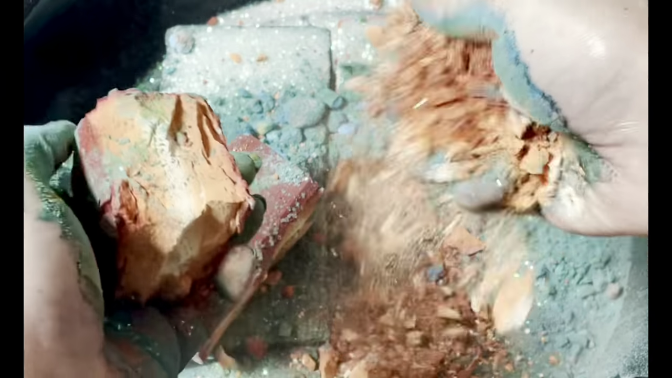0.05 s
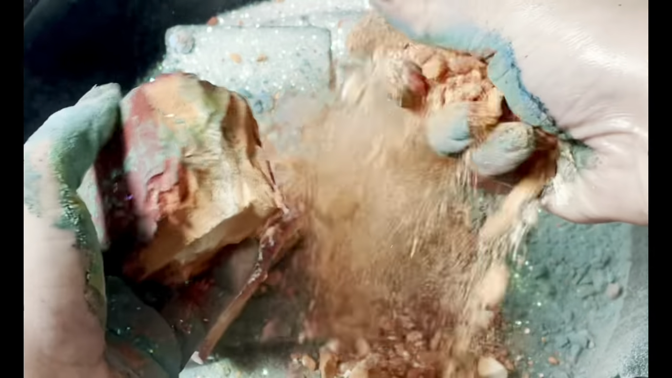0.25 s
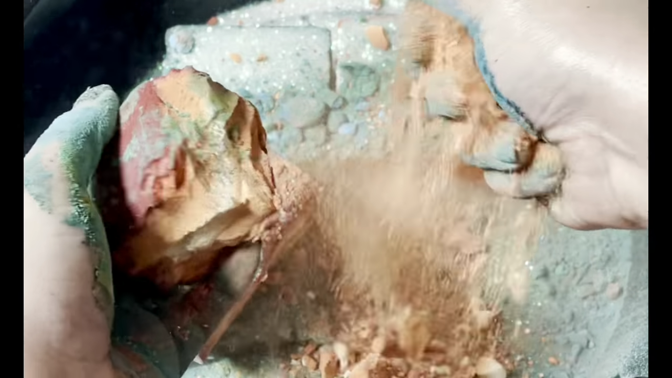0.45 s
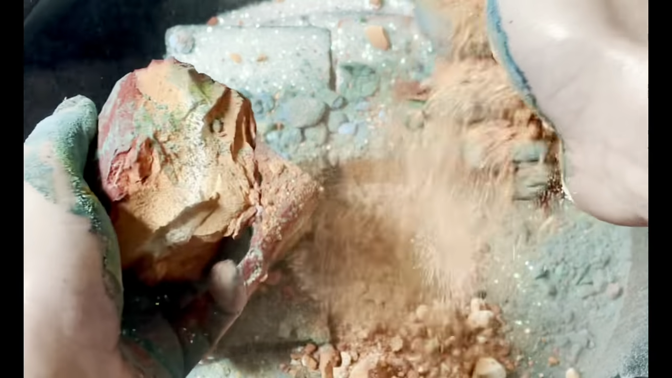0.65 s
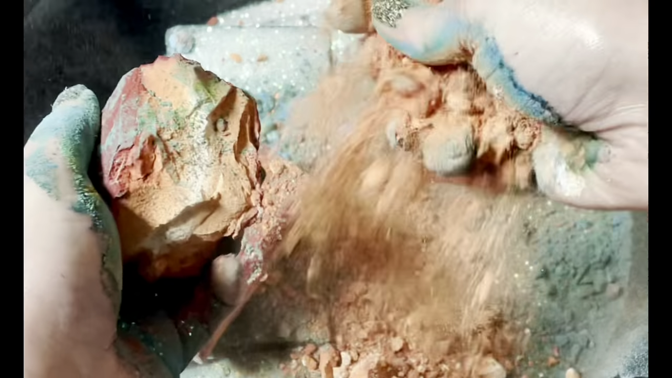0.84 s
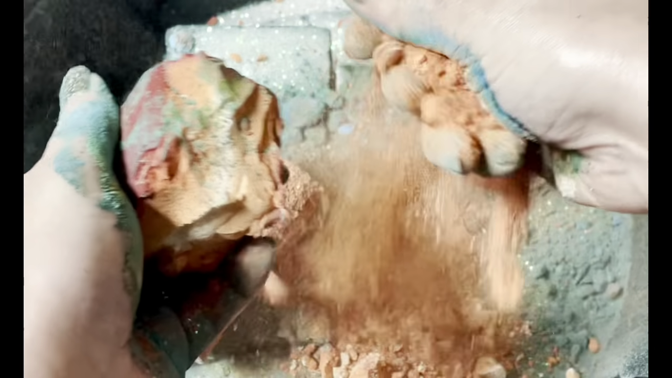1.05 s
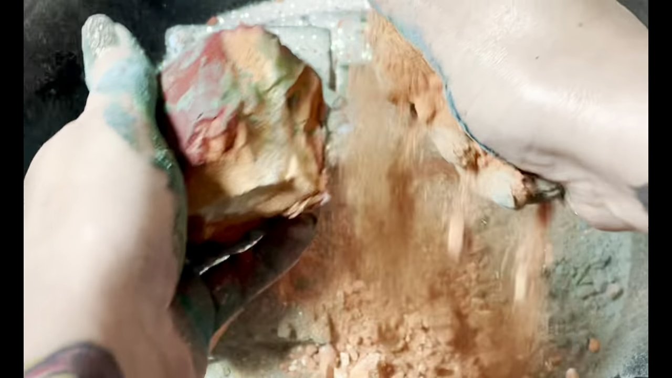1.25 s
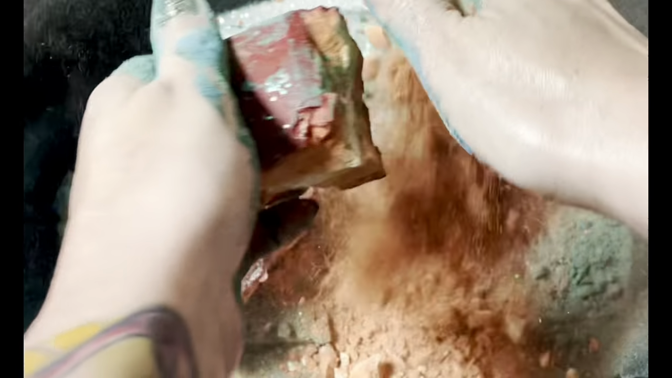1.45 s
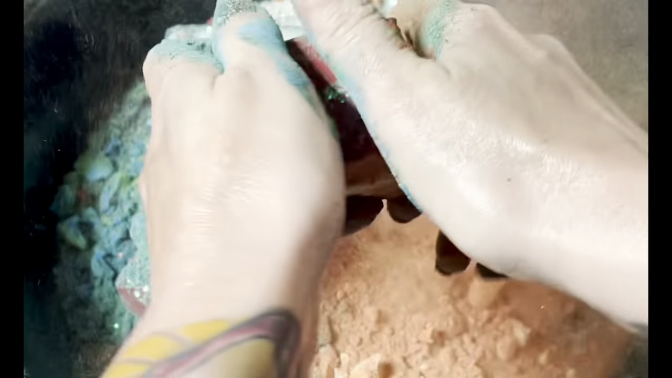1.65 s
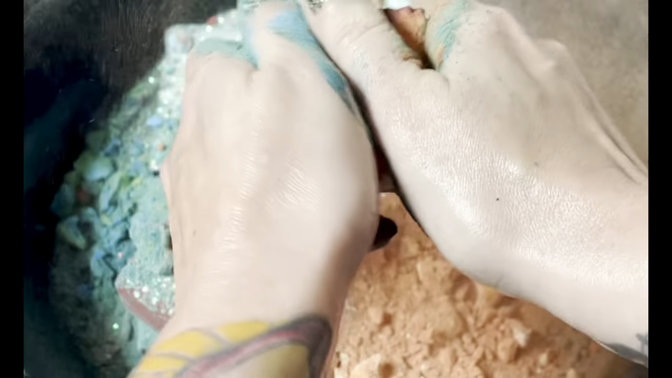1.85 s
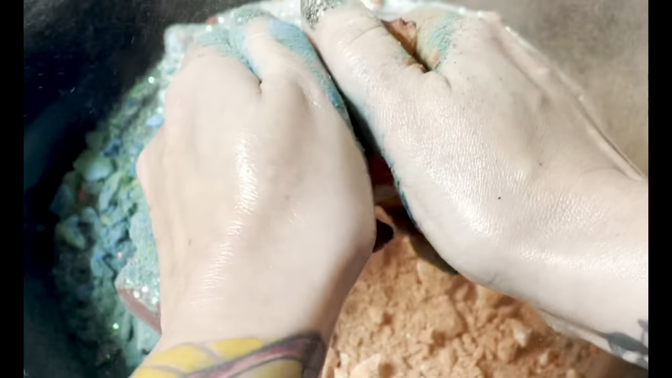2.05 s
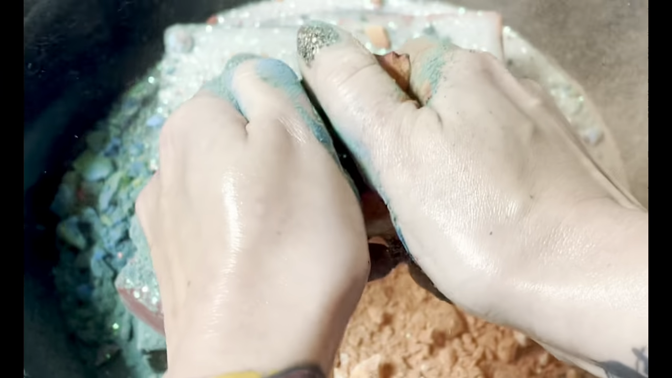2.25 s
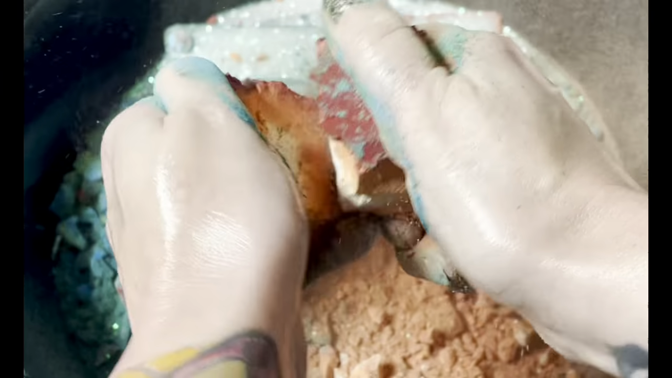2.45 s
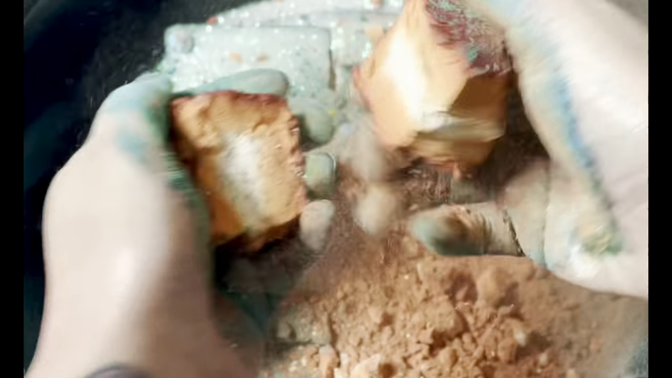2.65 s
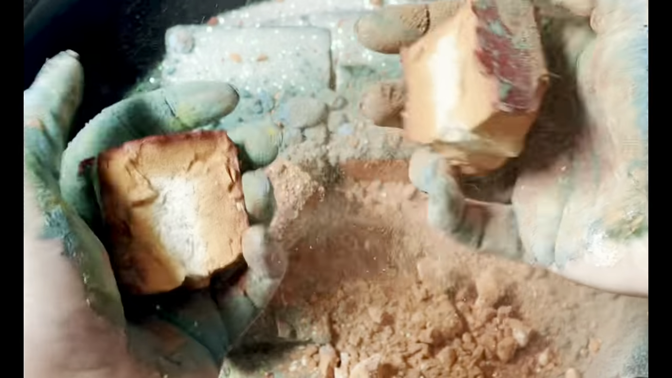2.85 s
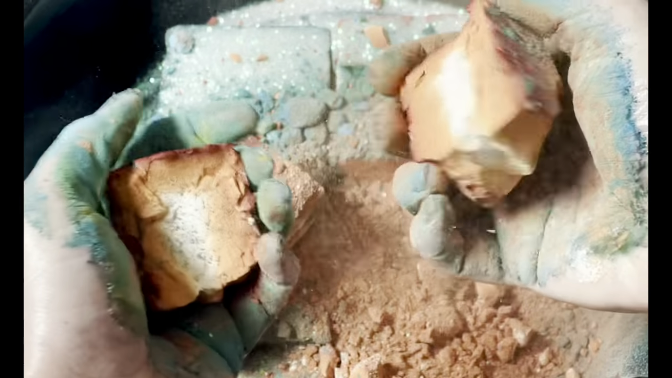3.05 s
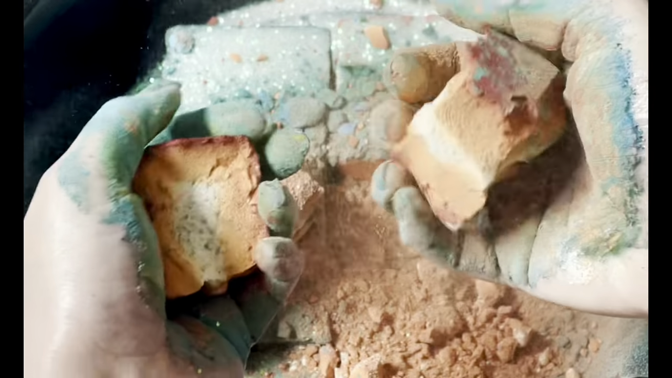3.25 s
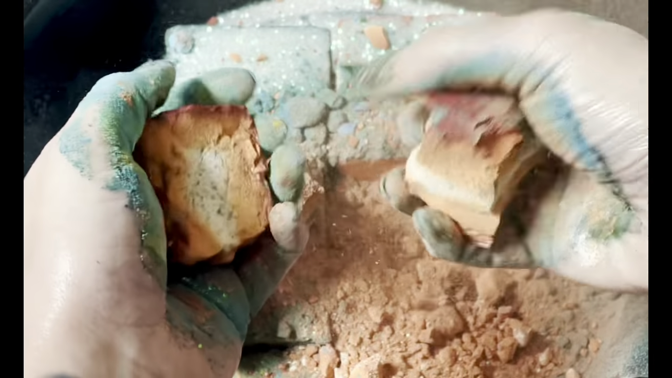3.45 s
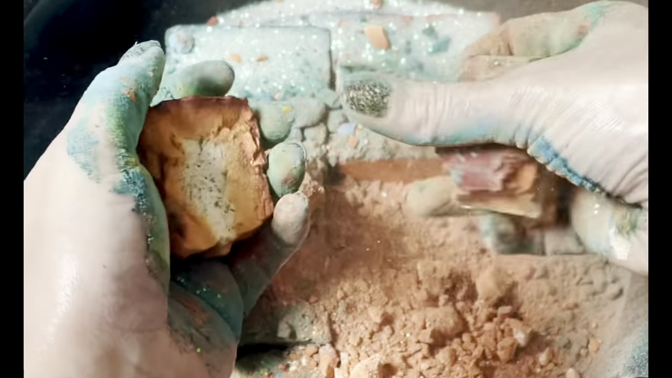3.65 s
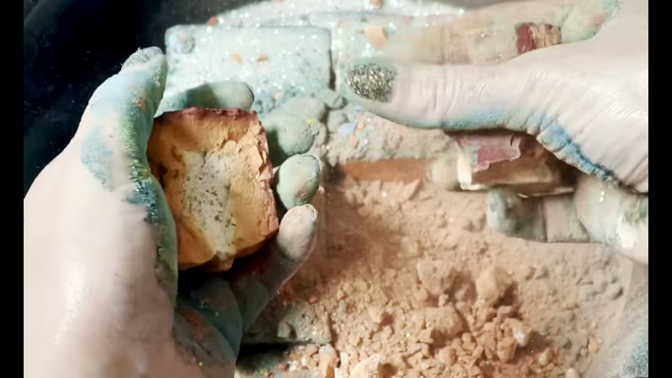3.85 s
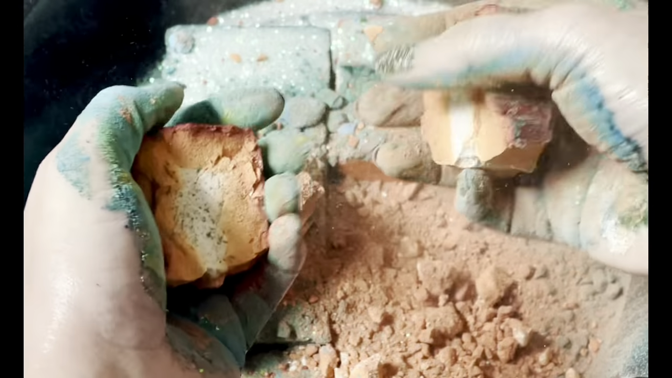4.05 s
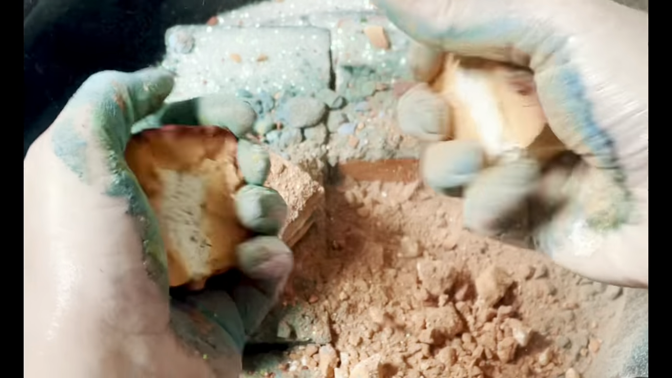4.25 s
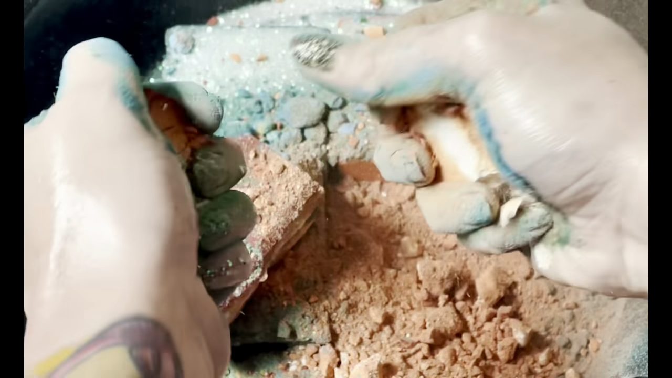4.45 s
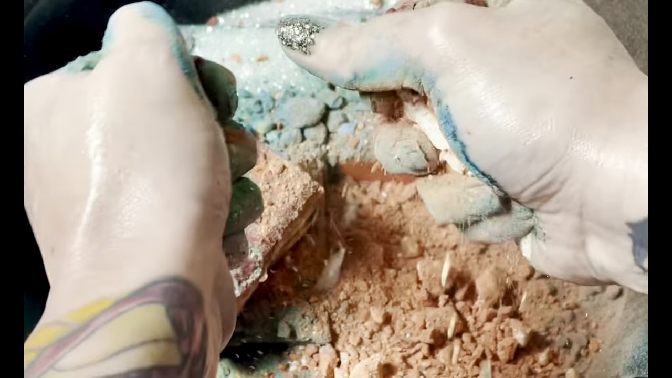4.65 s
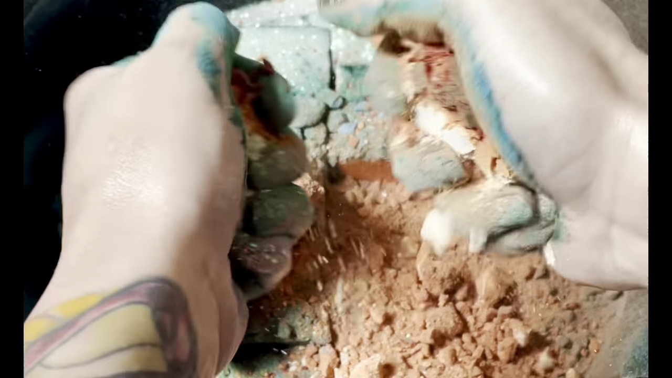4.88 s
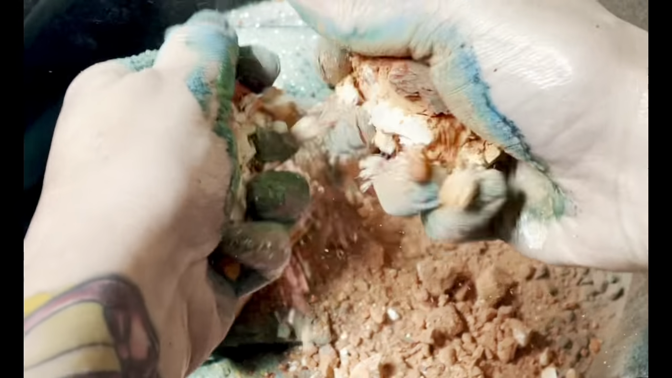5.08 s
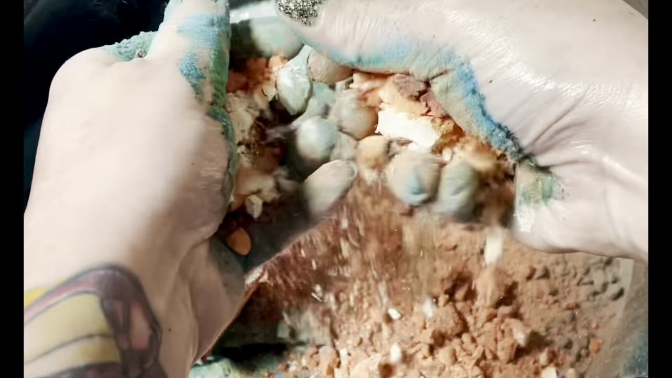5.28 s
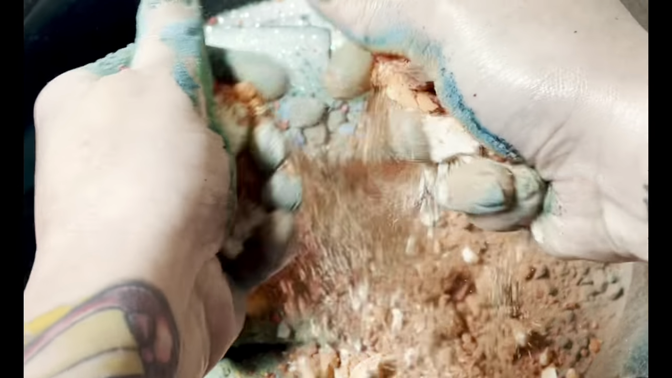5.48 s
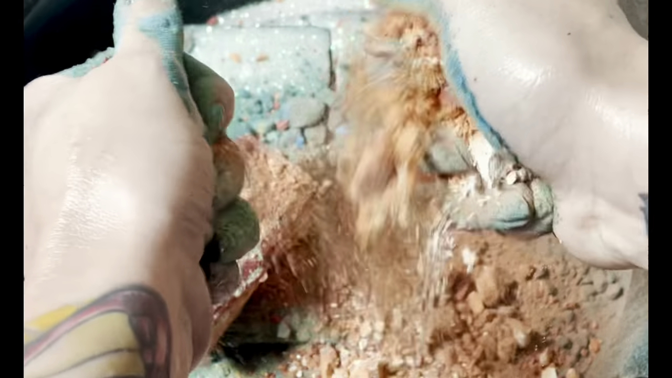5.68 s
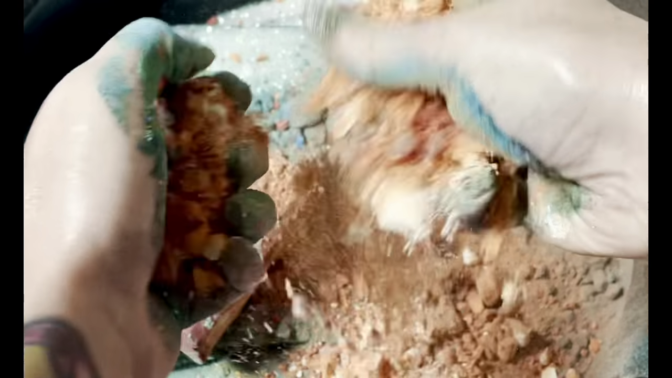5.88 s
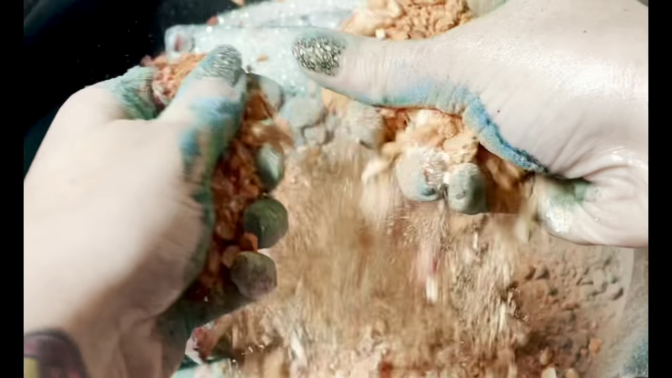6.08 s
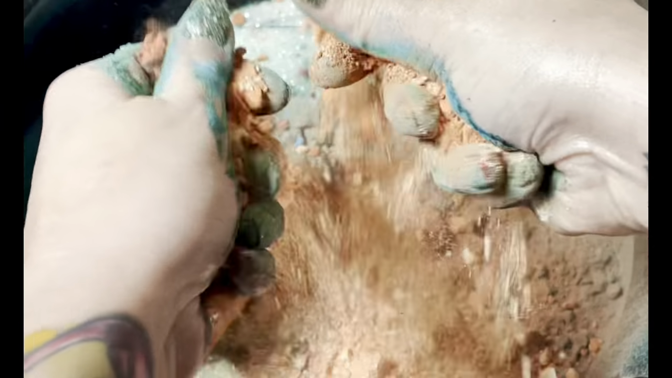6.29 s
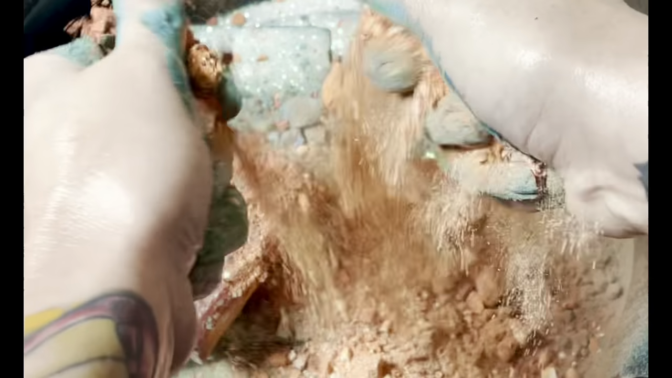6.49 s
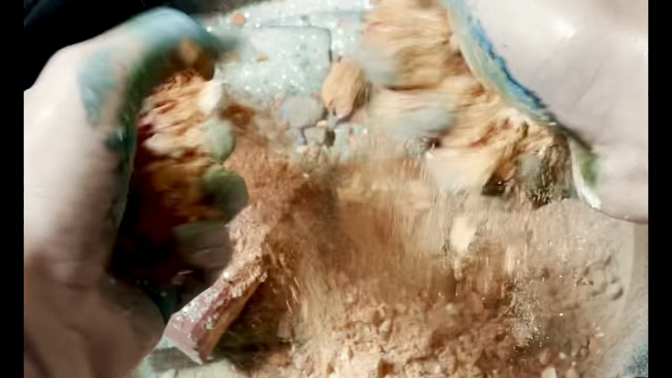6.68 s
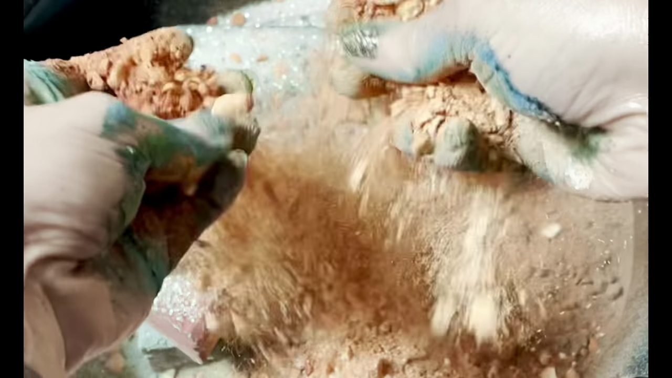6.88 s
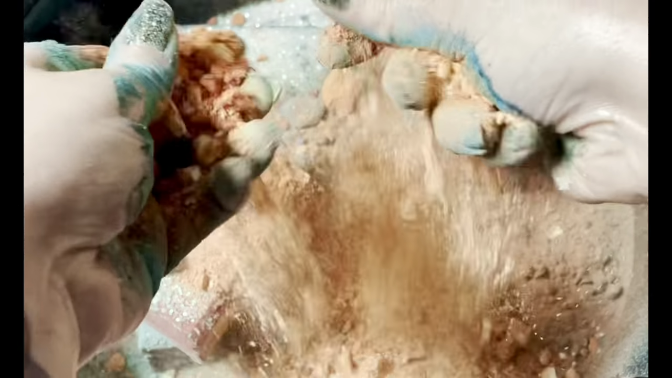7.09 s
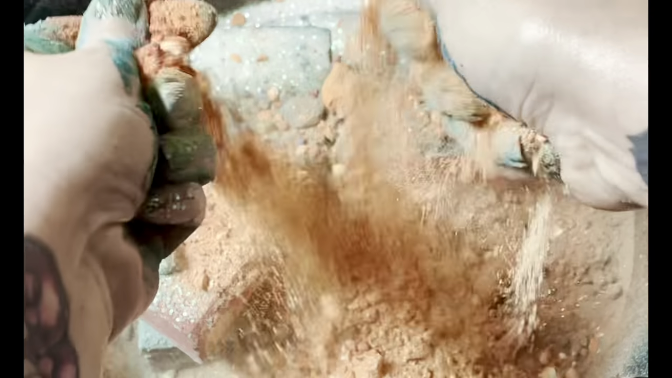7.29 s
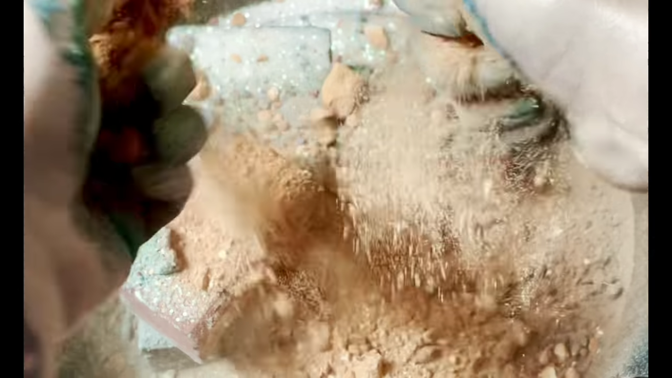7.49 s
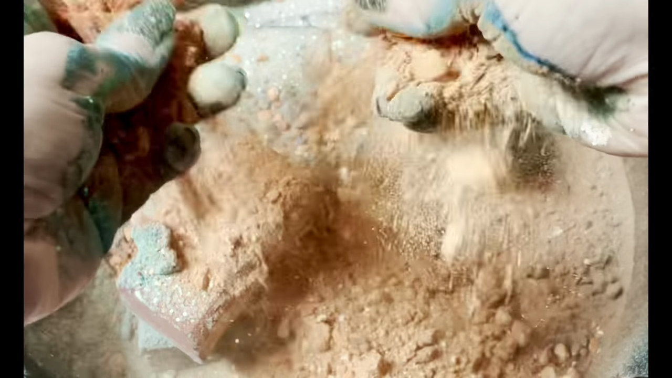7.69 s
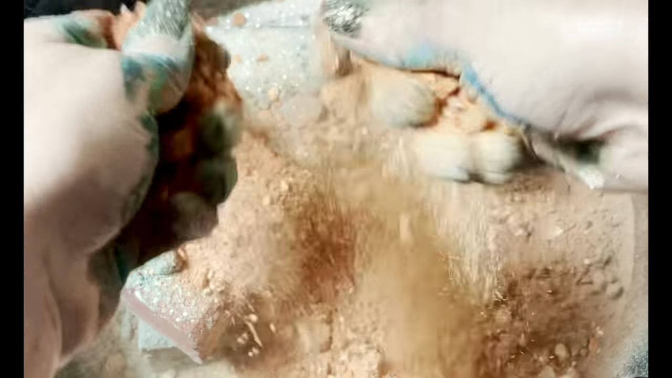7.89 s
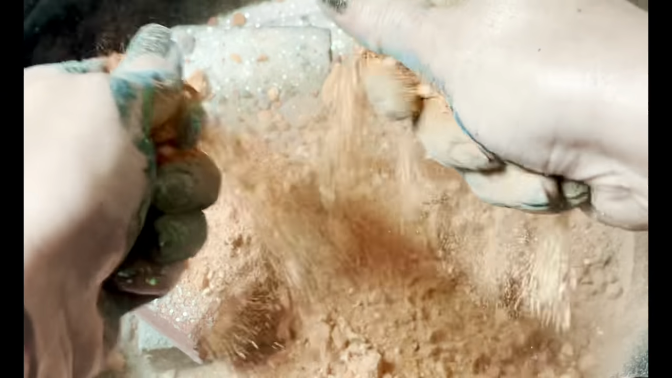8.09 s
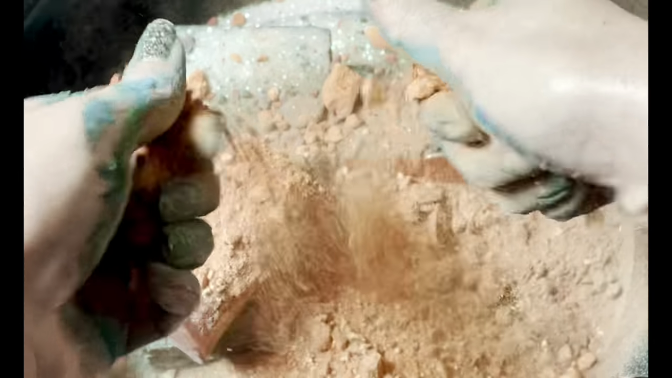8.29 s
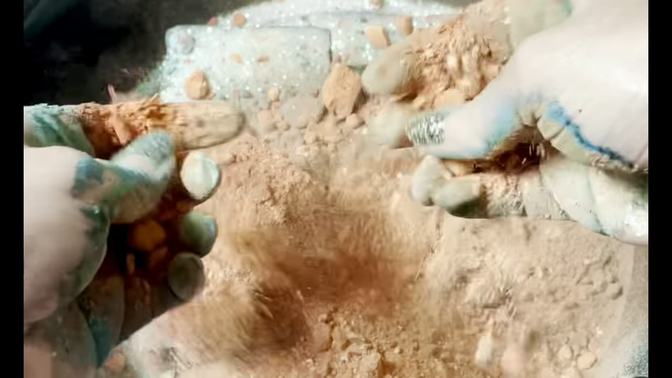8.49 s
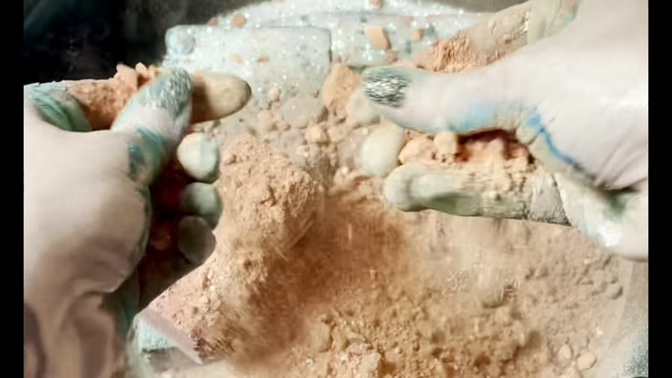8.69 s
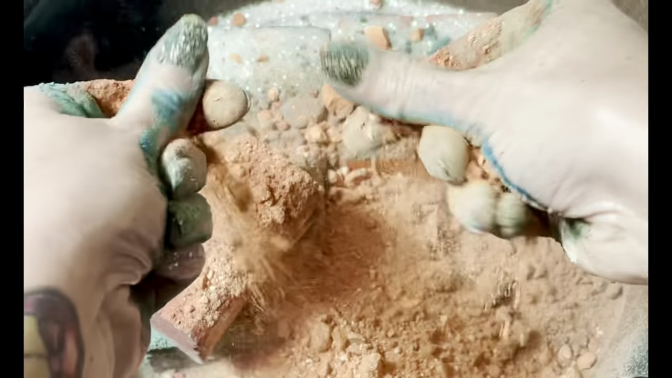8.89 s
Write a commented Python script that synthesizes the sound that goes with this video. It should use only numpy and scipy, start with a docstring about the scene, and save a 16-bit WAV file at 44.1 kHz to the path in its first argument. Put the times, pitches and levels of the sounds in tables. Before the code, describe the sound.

Hands crush dry chalk blocks into crumbs right at the microphone, with gritty crunching, ticking, one loud crack, and powder hissing down.

```python
"""Two hands crush blocks of gym chalk over a tub of powder, right at the microphone of a small room. The blocks
tick under strain, one breaks in half with a loud crack, and the pieces are squeezed to crumbs. Single fractures
are short noise rattles; thousands of smaller ones and filtered noise make the crunching bed and the hiss of
powder. Jittered modes make short hollow rings, gliding low tones the thuds of the block and the tub, and low
noise the rumble of air and tub; a faint room tail lies behind."""
import sys
import numpy as np
from scipy import signal
from scipy.fft import rfft, irfft, next_fast_len
from scipy.io import wavfile
from scipy.ndimage import uniform_filter1d

SR = 44100
rng = np.random.default_rng(int(sys.argv[2]) if len(sys.argv) > 2 else 0)


def wrap_up_sound(samples):
    """Save the sound to the file named by the first command line argument, as 16-bit audio."""
    columns = np.atleast_2d(samples).T
    # keep every value between -1 and 1, then stretch to whole-number steps
    tamed = np.clip(columns, -1, 1)
    steps = np.round(tamed * 32767).astype(np.int16)
    wavfile.write(sys.argv[1], SR, steps)


N = 393811


def amp(db):
    """Decibels to gain."""
    return 10 ** (np.asarray(db) / 20)


def unit(x):
    """Scales to rms 1."""
    return x / np.sqrt(np.mean(x ** 2) + 1e-20)


def read(points, hz):
    """Reads a curve of (frequency, value) points on a log-frequency axis."""
    f, value = np.transpose(points)
    return np.interp(np.log(hz + 1), np.log(f + 1), value)


def add(mix, s, sound):
    """Lays a sound into the mix at time s."""
    part = mix[max(round(s * SR), 0):][:len(sound)]
    part += sound[:len(part)]


def shape(x, gain):
    """Filters by a gain that is a function of frequency."""
    size = next_fast_len(len(x))
    hz = np.fft.rfftfreq(size, 1 / SR)
    return irfft(rfft(x, size) * gain(hz), size)[:len(x)]


def below(hz, edge_hz, order=8):
    """Gain of a low-pass; one minus it is the matching high-pass."""
    return 1 / (1 + (hz / edge_hz) ** order)


def drift(rate_hz):
    """Random wander of rms 1, with little movement faster than rate_hz."""
    return unit(shape(rng.standard_normal(N), lambda hz: below(hz, rate_hz, order=4)))


def swells(rows):
    """Gain of soft, bell-shaped swells whose powers add up; each is down to 1/e at half_s from its middle."""
    t = np.arange(N) / SR
    power = np.zeros(N)
    for middle_s, half_s, db in rows:
        distance = (t - middle_s) / half_s
        power += amp(db) ** 2 * np.exp(-2 * np.minimum(distance ** 2, 20))
    return np.sqrt(power)


def stroke(start_s, hold_s, attack_s, release_s):
    """Gain of one move of the fingers: it builds up around start_s, holds, and dies away."""
    t = np.arange(N) / SR - start_s
    rise = .5 * (1 + np.tanh(t / (2 * attack_s)))
    return rise * np.exp(-np.clip((t - hold_s) / release_s, 0, 20))


# how long each band of the small room takes to fall by 60 dB: hz, t60_s
ROOM_DECAY = [(100, 0.73), (500, 0.13), (2000, 0.4), (4000, 0.24), (16000, 0.16)]
# starting strength of each band of the room's tail: hz, gain_db
ROOM_COLOUR = [(60, 5), (600, -2), (1300, -7.5), (2700, -6), (5000, -8), (9000, -3.5), (16000, -13.5)]


def room(x, wet_db=-15.0, size=32768):
    """A faint diffuse tail: noise in which each band dies at its own speed."""
    hz, t, z = signal.stft(rng.standard_normal(size), SR, nperseg=256)
    fall_db = -60 * t / read(ROOM_DECAY, hz)[:, None]
    colour_db = read(ROOM_COLOUR, hz)[:, None]
    tail = signal.istft(z * amp(fall_db + colour_db), SR, nperseg=256)[1]
    tail *= 1 - np.exp(-np.arange(len(tail)) / SR / 0.001)  # soft onset of 1 ms
    return amp(wet_db) * signal.fftconvolve(x, tail / np.linalg.norm(tail))[:N]


# a hand sweeps past the microphone and pushes air: middle_s, half_s, level_db
SWEEPS = [(.2, .25, -45), (1.76, 0.39, -40.5), (2.294, 0.3, -35.5), (3.257, 0.08, -40.5), (3.58, 0.22, -50),
          (4.35, 0.13, -35), (4.62, .2, -41), (5.25, 0.22, -48), (5.7, 0.163, -37), (6.3, 0.36, -47),
          (7.16, .07, -38), (8.68, 0.17, -42.5)]
# a handful of crumbs pours into the tub and makes it boom: middle_s, half_s, level_db
POURS = [(.2, 0.28, -53), (1.27, 0.23, -47.5), (1.5, 0.045, -41), (3.6, 0.044, -48), (5.23, 0.028, -45),
         (5.68, 0.38, -45), (7.92, 0.12, -42)]
# colour of the rumble of air and tub: hz, gain_db
RUMBLE = [(8.8, -14), (15, 4.5), (27, 4), (43, -1.5), (75, 1.5), (123, -5.5), (161, -11.5), (225, -15),
          (260, -14.5), (340, -15), (570, -120)]
DRAUGHT_DB = -51  # air stirred by the hands all along
TUB_DB, TUB_FOLLOW_DB = -58, -5.5  # hum of the tub: at rest, and against the crunch as crumbs rain in
STIR_EDGE_HZ = 55  # air below, tub above


def stirring(crunch):
    """Low noise: air swells as a hand sweeps by, and the tub hums under the falling crumbs."""
    draught = np.hypot(amp(DRAUGHT_DB), swells(SWEEPS))
    tub = np.sqrt(amp(TUB_DB) ** 2 + swells(POURS) ** 2 + (amp(TUB_FOLLOW_DB) * crunch) ** 2)
    noise = shape(rng.standard_normal(N), lambda hz: amp(read(RUMBLE, hz)))
    low = shape(noise, lambda hz: below(hz, STIR_EDGE_HZ))
    return draught * unit(low) + tub * unit(noise - low)


# low pushes when a block gives way or meets the tub: start_s, start_level_db, first_hz, last_hz, decay_s
THUMPS = [(1.533, -25.5, 73.6, 74, 0.067), (2.196, -30, 248, 31, .012), (2.2809, -3.5, 79, 18, 0.04),
          (2.2825, -6, 252, 370, 0.0044), (3.828, -23, 284, 300, 0.0025), (4.348, -14.5, 104, 16, 0.019),
          (4.501, -18.5, 260, 41, 0.015), (4.747, -26, 221, 80, 0.0074), (7.809, -11, 375, 190, 0.0015),
          (7.82, -28, 85, 78, 0.038), (8.6647, -21.5, 260, 74, 0.0033)]


def thumps(glide_s=0.0078, size=12000):
    """Each low thud is a dying swing whose pitch glides from the first to the last."""
    out, t = np.zeros(N), np.arange(size) / SR
    for s, db, first_hz, last_hz, decay_s in THUMPS:
        hz = last_hz + (first_hz - last_hz) * np.exp(-t / glide_s)
        swing = np.sin(2 * np.pi * np.cumsum(hz) / SR)
        add(out, s, -amp(db) * swing * np.exp(-t / decay_s))
    return out


# modes of a hollow ring, the higher ones dying sooner: pitch_multiple, level_db
RING_MODES = [(1, 1), (1.31, -1.5), (1.86, -6.5), (2.9, -13)]


def hollow_ring(hz, decay_s, jitter_depth=0.14, size=2048):
    """A few short-lived modes; random pitch jitter roughens the ring."""
    t = np.arange(size) / SR
    ring = np.zeros(size)
    for k, db in RING_MODES:
        jitter = unit(uniform_filter1d(rng.standard_normal(size), size=30))
        pitch_hz = hz * k * (1 + jitter_depth * jitter)
        ring += amp(db) * np.sin(2 * np.pi * np.cumsum(pitch_hz) / SR) * np.exp(-t * k / decay_s)
    return ring * (1 - np.exp(-t / 0.00034))  # soft onset


# short hollow rings: the breaking block, a scrape, knocking lumps:
# start_s, level_db (before the mode levels and decay), pitch_hz, decay_s
HOLLOW_RINGS = [(1.554, -17.5, 1444, 0.0026), (2.283, 4, 2220, 0.0007), (2.548, -31, 2064, 0.008),
                (4.145, -23, 2120, 0.0072), (5.827, -16, 987, 0.0037), (5.829, -42, 1380, 0.0041),
                (6.033, -25.5, 1115, 0.0065), (7.8086, 0.5, 2820, 0.0012), (7.8095, -7.5, 996, 0.0039),
                (8.525, -18.5, 1560, 0.0014), (8.74, -26, 1126, 0.0035)]


def hollow_rings():
    """Short hollow rings of the breaking block, a scrape and knocking lumps, each a set of dying modes."""
    out = np.zeros(N)
    for s, db, hz, decay_s in HOLLOW_RINGS:
        add(out, s, amp(db) * hollow_ring(hz, decay_s))
    return out


def resonate(x, hz, width_hz):
    """A resonance that follows hz: shift it down to zero, smooth twice, shift back; rms 1."""
    turn = np.exp(2j * np.pi * np.cumsum(hz * np.ones(N)) / SR)
    r = np.exp(-np.pi * width_hz / SR)
    once = signal.lfilter([1 - r], [1, -r], x / turn)
    twice = signal.lfilter([1 - r], [1, -r], once)
    return unit((turn * twice).real)


# the hollow of the rubbing hand opens and shuts: time_s, resonance_hz
HOLLOW = [(1.62, 4660), (1.8, 3700), (2.6, 6200), (2.82, 3750), (3.06, 4050), (3.21, 7140), (3.62, 5300),
          (6.5, 4930), (7.73, 3140), (8.5, 3580)]


def rub(hollow_db=-1.5, palm_db=-13, wide_db=-1):
    """Powder sliding on skin: a fine hiss, coloured by the hollow of the hand and by the soft palm."""
    catch_and_slip_db = 2.0 * drift(150) + 2.7 * drift(25)
    noise = rng.standard_normal(N) * amp(catch_and_slip_db)
    hollow_hz = np.interp(np.arange(N) / SR, *np.transpose(HOLLOW))
    fizz = unit(shape(noise, lambda hz: 1 - below(hz, 3800, order=2)))
    hollow = resonate(noise, hollow_hz, 2300)
    palm = resonate(noise, 420, 500)
    return amp(wide_db) * fizz + amp(hollow_db) * hollow + amp(palm_db) * palm


# tilt of every fracture: hz, gain_db
BRIGHTNESS = [(100, -1), (7500, 2.5), (10000, -3), (16000, -6.5)]


def click(centre_hz, octaves, size=1024):
    """A minimum-phase pulse of energy 1: a spectral bell around centre_hz, tilted by the brightness."""
    hz = np.fft.rfftfreq(size, 1 / SR)
    bell = (1 + (np.log2((hz + 1) / centre_hz) / octaves) ** 2) ** -1.5
    log_gain = np.log(bell * amp(read(BRIGHTNESS, hz)) + 1e-5)
    circle = np.concatenate([log_gain, log_gain[-2:0:-1]])
    pulse = np.fft.ifft(np.exp(np.conj(signal.hilbert(circle)))).real
    return pulse / np.linalg.norm(pulse)


def fracture(centre_hz, octaves, ring_s, rattle=3.4, size=1024):
    """One sharp release, then a fast-dying rattle as the crack runs through the piece; energy 1."""
    run = rng.standard_normal(size) * np.exp(-np.arange(size) / SR / ring_s)
    run *= rattle * np.sqrt(ring_s / 0.00048) / np.linalg.norm(run)  # longer rings rattle harder
    run[0] = 1  # the release
    sound = signal.fftconvolve(run, click(centre_hz, octaves))[:size]
    return sound / np.linalg.norm(sound)


def shower(sounds, per_s, spread_db, clump_db):
    """Plays the given grains at random and in clumps: many faint, a few strong; rms 1."""
    chance = amp(clump_db * drift(45))
    at = np.flatnonzero(rng.random(N) < per_s / SR * chance / chance.mean())
    strength, side, family = rng.random((len(at), 3)).T
    height_db = spread_db * np.minimum(-np.log(1 - strength), 4.5)
    height = amp(height_db) * np.sign(side - .5)  # either polarity
    out = np.zeros(N)
    for k, sound in enumerate(sounds):
        mine = (family * len(sounds)).astype(int) == k
        train = np.zeros(N)
        train[at[mine]] = height[mine]
        out += signal.oaconvolve(train, sound)[:N]
    return unit(out)


def crumbs(pellet_db=-9, chip_db=-3, count=48):
    """Fine sharp fractures with the duller knocks of rolling pellets; apart from them, the odd larger chip."""
    tiny = [fracture(hz, rng.uniform(0.73, 2.8), 0.00079 * np.sqrt(3000 / hz))
            for hz in np.linspace(500, 12000, count)]
    chips = [fracture(hz, rng.uniform(.35, 2), 0.0009 * np.sqrt(3000 / hz))
             for hz in np.geomspace(1000, 8000, count // 2)]
    pellets = [hollow_ring(hz, 2.0 / hz) for hz in np.geomspace(450, 2400, count // 2)]
    fine = shower(tiny, per_s=3000, spread_db=4.3, clump_db=3.0)
    fine += amp(pellet_db) * shower(pellets, per_s=600, spread_db=4.0, clump_db=3)
    return fine, amp(chip_db) * shower(chips, per_s=36, spread_db=1.6, clump_db=1)


# colour of the crumbling bed, before its three bands are levelled: hz, gain_db
CRUMBLE = [(71, -29), (120, 2.5), (217, -5), (402, -2.5), (535, -7), (643, -7), (698, -9), (1210, -3.5),
           (2110, -7.5), (3170, -8.5), (5300, -10), (6770, -11.5), (10600, -25), (13300, -20.5),
           (16000, -29.5)]
CRUNCH_TOP_HZ, HISS_BOTTOM_HZ = 2200, 8000  # grit lies between crunch and hiss


def crushing(crunch, grit, hiss, powder_db=-9, rub_db=5):
    """Crackle over sliding powder; where the hiss leads, skin is rubbing and the sound is smoother."""
    rubbing = hiss ** 2 / (hiss ** 2 + crunch ** 2)
    powder = rng.standard_normal(N) * amp(2.0 * drift(120))
    fine, chips = crumbs()
    bed = fine + amp(powder_db) * powder + amp(rub_db) * rubbing ** 2 * rub()
    bed /= np.sqrt(uniform_filter1d(bed ** 2, size=4000) + 1e-9)  # evened out: the fingers set the strength
    bed = shape(bed + (1 - rubbing) * chips, lambda hz: amp(read(CRUMBLE, hz)))
    low = shape(bed, lambda hz: below(hz, CRUNCH_TOP_HZ))
    high = shape(bed, lambda hz: 1 - below(hz, HISS_BOTTOM_HZ, order=16))
    middle = bed - low - high
    return crunch * unit(low) + grit * unit(middle) + hiss * unit(high)


# the fingers close on the pieces, finer pieces giving more grit:
# start_s, hold_s, crunch_level_db, grit_above_crunch_db
SQUEEZES = [(0.0, 0.028, -41, -1), (0.097, 0.35, -45, 0.5), (0.503, 0.055, -41, 0),
            (0.622, 0.068, -47.5, -3.5), (0.804, 0.11, -51, 4), (0.979, 0.026, -41.5, -0.5),
            (1.07, 0.25, -48.5, -1), (1.449, 0.046, -40.5, 2.5), (1.575, 0.059, -70, 13),
            (2.293, 0.024, -43, 5), (2.397, 0.2, -51, 5), (4.293, 0.029, -39, 8.5), (4.498, 0.02, -42, 7),
            (4.598, 0.33, -48.5, 3.5), (4.94, 0.18, -44.5, 4), (5.172, 0.089, -42, 3),
            (5.38, 0.047, -39.5, 4), (5.514, 0.16, -44.5, 1.5), (5.745, 0.091, -42.5, -4.5),
            (5.91, 0.21, -46.5, 0.5), (5.964, 0.42, -42.5, 1.5), (6.445, 0.12, -42.5, 3.5),
            (6.634, .33, -47.5, 3.5), (7.005, 0.24, -39.5, 0), (7.333, .11, -46.5, 4.5),
            (7.643, 0.12, -51, 8.5), (7.804, 0.13, -38, -1.5), (7.983, 0.17, -46, -0.5),
            (8.37, 0.21, -53, 6), (8.53, 0.15, -44, 5.5), (8.758, 0.13, -51, 6.5)]
SQUEEZE_ATTACK_S, SQUEEZE_RELEASE_S = .009, 0.077  # the pieces give way quickly and trickle on a little
SQUEEZE_HISS_DB, HISS_PER_GRIT = -7.5, 0.93  # hiss against the crunch, and its rise per dB of grit
# a block or powder slides over skin, swelling and fading: middle_s, half_s, grit_level_db
RUBS = [(.213, .025, -39), (1.67, .03, -51.5), (1.8, 0.025, -46.5), (2.55, 0.019, -39), (2.63, 0.14, -53),
        (2.85, 0.05, -54.5), (2.96, 0.036, -49), (3.047, 0.017, -42.5), (3.212, 0.022, -36),
        (3.47, 0.038, -36.5), (3.56, 0.041, -40.5), (3.63, 0.032, -38), (3.72, 0.03, -46),
        (3.828, 0.0058, -34), (3.928, 0.017, -48), (4.04, .09, -52.5), (4.16, 0.02, -32),
        (4.23, 0.037, -33), (8.21, 0.06, -47)]
RUB_CRUNCH_DB, RUB_HISS_DB = -8.5, -1  # against the grit: sliding is thin and bright
REST_CRUNCH_DB, REST_GRIT_DB, REST_HISS_DB = -60.5, -55, -60.5  # powder sifting under resting fingers
# the fingers lock on the block before it breaks, and the sifting dips
STRAIN_START_S, STRAIN_HOLD_S, STRAIN_EASE_S, STRAIN_CHANGE_DB = 2.08, 0.22, 0.016, -4.5


def fingers():
    """Gains of crunch, grit and hiss: the powers of sifting, squeezes and rubs add up."""
    strain = stroke(STRAIN_START_S, STRAIN_HOLD_S, STRAIN_EASE_S, STRAIN_EASE_S)
    sifting = amp(STRAIN_CHANGE_DB * strain)
    power = np.outer(amp([REST_CRUNCH_DB, REST_GRIT_DB, REST_HISS_DB]), sifting) ** 2
    power += np.outer(amp([RUB_CRUNCH_DB, 0, RUB_HISS_DB]), swells(RUBS)) ** 2
    for s, hold_s, db, grit_db in SQUEEZES:
        hiss_db = HISS_PER_GRIT * grit_db + SQUEEZE_HISS_DB
        bands = amp([db, db + grit_db, db + hiss_db])
        power += np.outer(bands, stroke(s, hold_s, SQUEEZE_ATTACK_S, SQUEEZE_RELEASE_S)) ** 2
    return np.sqrt(power)


# one row a loud fracture close to the microphone:
# start_s, level_db (over 2 ms), centre_hz (before the brightness tilt), spread_octaves, ring_s
SNAPS = [(0.2048, -25, 1860, 2.8, 0.011), (0.3567, -24, 1960, 4.1, 0.0016),
         (0.59, -27.5, 1700, 2.3, 0.0024), (0.7366, -29, 4000, 0.5, 0.00018),
         (1.011, -26, 2800, 0.91, 0.0025), (1.0943, -25.5, 920, 1.75, 0.0024),
         (1.1876, -29.5, 1360, 0.54, 0.00084), (1.2098, -31, 2860, 2.1, .0025),
         (1.3, -30, 810, 2.9, 0.00073), (1.3184, -27, 730, 1.7, 0.0029), (1.4109, -32, 590, 1.35, 0.0037),
         (1.465, -31, 1510, 3.2, .003), (1.501, -26.5, 1770, 1.3, 0.0017),
         (1.518, -25.5, 1050, 1.3, 0.0022), (1.869, -18.5, 6000, 3, 0.0015),
         (1.9036, -26, 10400, 3, 0.00045), (1.932, -14, 10400, 2.55, 0.00076),
         (2.0333, -18.5, 3000, 1.9, 0.00098), (2.058, -33, 6560, 0.27, .0004),
         (2.2092, -39, 8040, 1.2, 0.00048), (2.2796, -8, 1230, 3.9, .0015),
         (2.2807, -5.5, 1520, 1.8, .0013), (2.2823, -1.5, 1920, 0.95, 0.0018),
         (2.288, -15, 2070, 3.2, 0.0011), (2.3375, -26, 2830, 3.8, .001), (2.4355, -27, 3830, 2, 0.0043),
         (2.491, -29, 5106, 1.7, .0005), (2.823, -25, 3940, .4, 0.00033),
         (3.1458, -32.5, 5840, 1.5, 0.00058), (3.337, -32, 9200, 1.9, 0.00095),
         (3.9746, -16, 6880, 2.1, 0.0012), (4.2113, -15.5, 10900, 3.1, 0.0031),
         (4.239, -19, 3600, 1.2, 0.0008), (4.2627, -17.5, 11000, 2.7, .0005),
         (4.3001, -16, 4770, 3, 0.00028), (4.317, -17.5, 2830, 1.5, 0.00057),
         (4.331, -11, 2040, 2, 0.00022), (4.3468, -10, 2220, 1.8, 0.0024), (4.3668, -20, 8400, 1.5, .0003),
         (4.3779, -20.5, 1220, 1.8, .0004), (4.387, -20, 4760, 0.61, 0.00071),
         (4.4234, -24.5, 9000, 1.6, 0.00019), (4.465, -27.5, 2670, 2.2, .0006),
         (4.496, -13.5, 4770, 2.5, 0.0021), (4.5005, -7.5, 1550, 4.1, 0.0019),
         (4.506, -15.5, 1430, 3.5, 0.00039), (4.519, -19, 5880, 0.92, 0.00053),
         (4.5903, -25.5, 3800, 1.1, 0.0016), (4.6077, -26, 2830, 2, 0.0015),
         (4.629, -22.5, 3200, .9, 0.00077), (4.7466, -11, 2030, 2.9, 0.00063),
         (4.7716, -21, 6650, 0.55, 0.00057), (4.936, -26, 1970, 1.7, 0.00047),
         (5.0077, -25, 1500, 3.1, 0.00082), (5.0797, -22.5, 2180, 2, .0015),
         (5.1412, -24.5, 6300, 0.23, 0.001), (5.2334, -28, 620, 1.9, 0.002),
         (5.2627, -19.5, 2485, 0.84, 0.0003), (5.405, -20, 2150, 0.89, 0.00096),
         (5.4264, -25, 4080, 1.3, .0002), (5.4554, -24, 1440, 2, 0.0013), (5.4854, -23, 4100, 3.2, 0.0035),
         (5.494, -22.5, 3980, 0.67, .0003), (5.534, -11.5, 2600, 1.84, 0.00038),
         (5.5958, -21, 3310, 3.8, 0.00014), (5.6097, -21.5, 715, 1.7, 0.0022),
         (6.106, -31, 2690, 1.8, .0004), (6.268, -32, 1790, 1, 0.00047), (6.2995, -25.5, 2870, 1.2, 0.0019),
         (6.3747, -27, 2300, 4, 0.00056), (6.491, -16, 3860, 0.54, 0.0013),
         (6.7461, -21.5, 4800, 0.58, 0.00047), (6.83, -23, 1400, 3.1, 0.0045),
         (7.038, -20, 1960, 2.3, 0.00029), (7.0846, -23, 1200, 2, 0.00052), (7.153, -19.5, 1940, 2, .0012),
         (7.2007, -24, 1580, 2.1, 0.0046), (7.5629, -23.5, 5000, 0.56, 0.001),
         (7.8092, -23, 1230, 1.2, 0.0009), (7.879, -27.5, 2070, 3.3, .0007),
         (7.9298, -15.5, 2120, 1.14, 0.0014), (8.031, -25, 5000, 1, 0.0019),
         (8.0715, -34, 2340, 1.6, 0.00039), (8.361, -28, 5200, 0.8, 0.0041),
         (8.4597, -28, 1260, 2.1, 0.003), (8.5642, -22, 3870, 1.4, 0.00089),
         (8.5882, -25, 4300, 3.2, 0.00027), (8.6659, -15.5, 2030, 1.1, 0.00067)]


def snaps():
    """The single loud fractures, each a sharp release and its rattle."""
    out = np.zeros(N)
    window = np.sqrt(.002 * SR)  # turns energy 1 into rms 1 over 2 ms
    for s, db, hz, octaves, ring_s in SNAPS:
        add(out, s, amp(db) * window * fracture(hz, octaves, ring_s))
    return out


SNAP_ROOM_DB, RING_ROOM_DB = -2, 1.5  # sent to the room: snaps are near the microphone and drier


def scene():
    """All the chalk sounds from one spot, the same in both channels."""
    crunch, grit, hiss = fingers()
    cracks, rings = snaps(), hollow_rings()
    crumble = crushing(crunch, grit, hiss)
    echo = room(amp(SNAP_ROOM_DB) * cracks + amp(RING_ROOM_DB) * rings + crumble)
    mono = cracks + rings + crumble + echo + thumps() + stirring(crunch)
    return np.array([mono, mono])


def record(dry):
    """The input clips whatever exceeds full scale; then a low-pass limits the band."""
    clipped = np.clip(dry, -1, 1)
    lowpass = signal.firwin(255, 16200, window=("kaiser", 8), fs=SR)  # cutoff in Hz
    return signal.oaconvolve(clipped, lowpass[None], "same")


dry = scene()
out = record(dry)
wrap_up_sound(out)
```